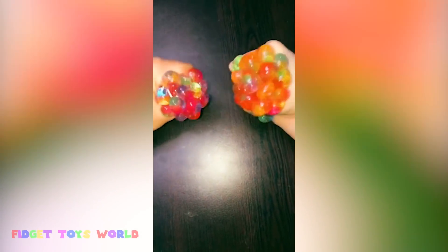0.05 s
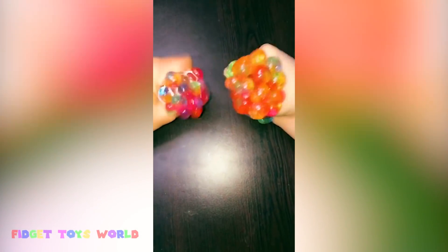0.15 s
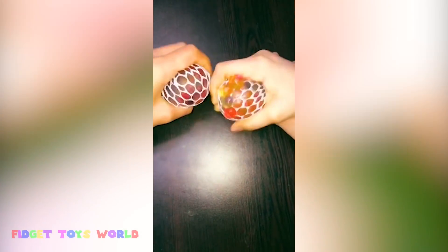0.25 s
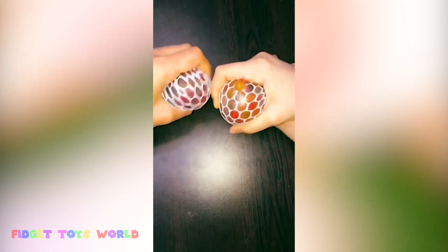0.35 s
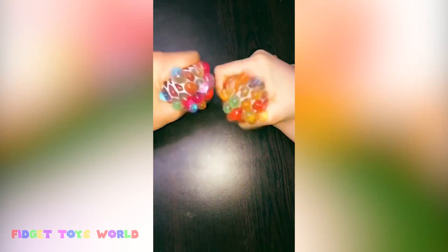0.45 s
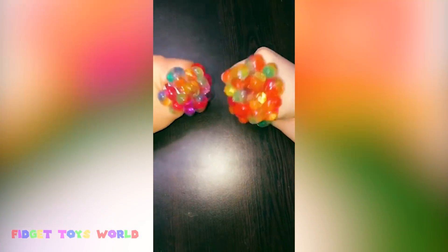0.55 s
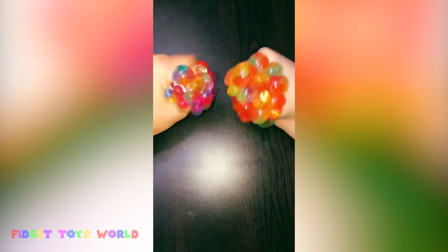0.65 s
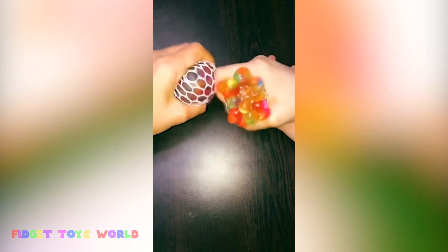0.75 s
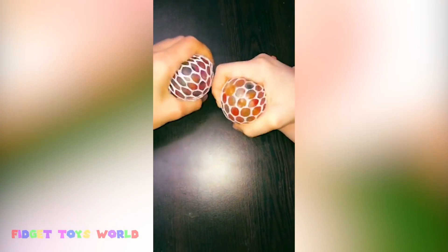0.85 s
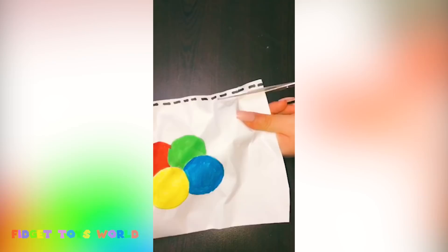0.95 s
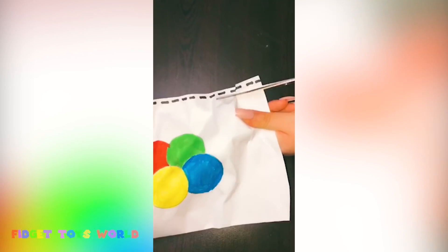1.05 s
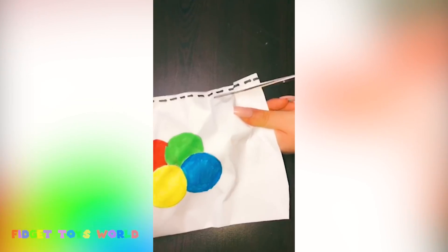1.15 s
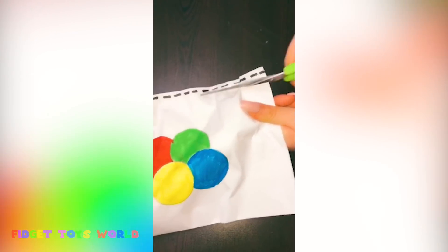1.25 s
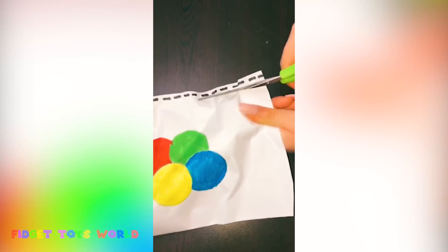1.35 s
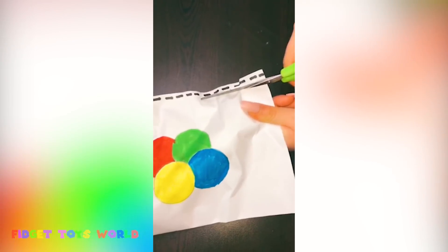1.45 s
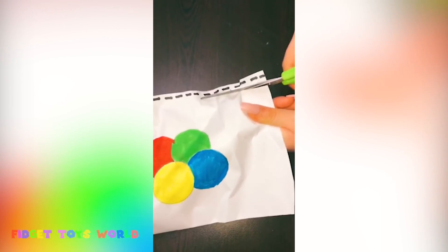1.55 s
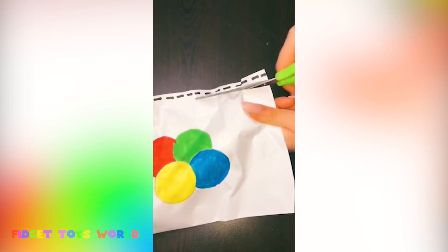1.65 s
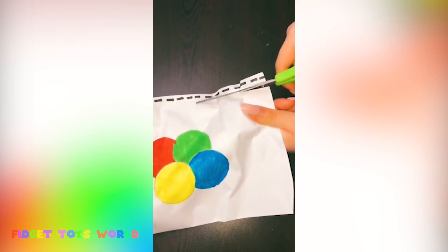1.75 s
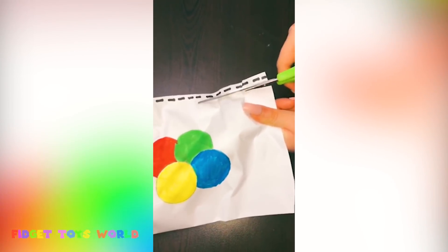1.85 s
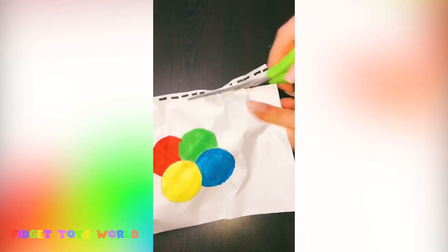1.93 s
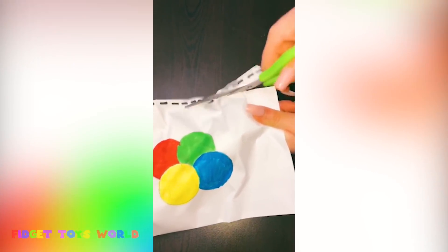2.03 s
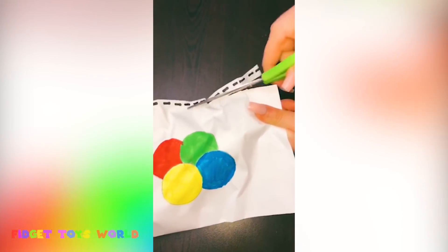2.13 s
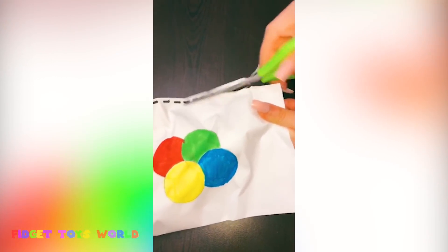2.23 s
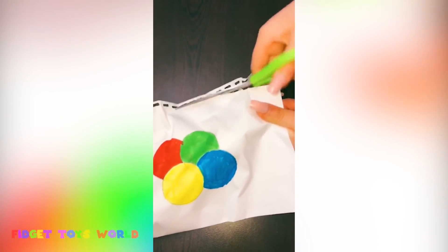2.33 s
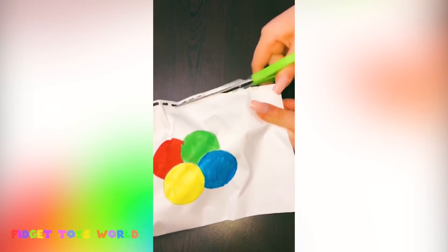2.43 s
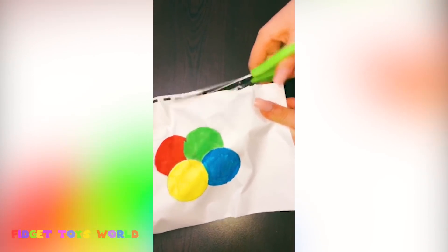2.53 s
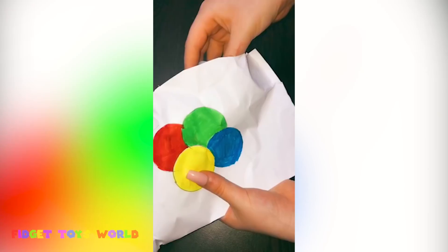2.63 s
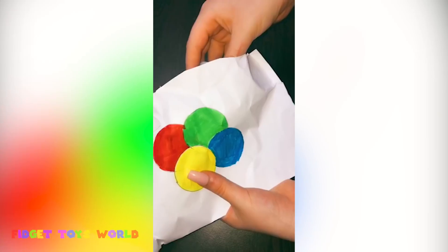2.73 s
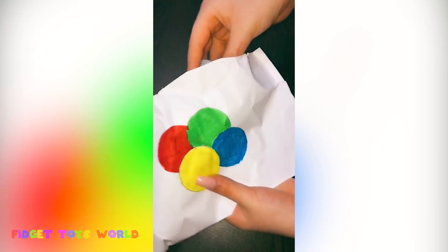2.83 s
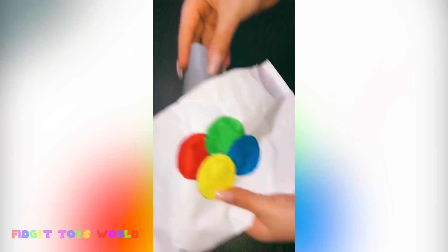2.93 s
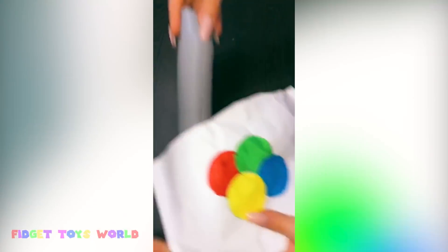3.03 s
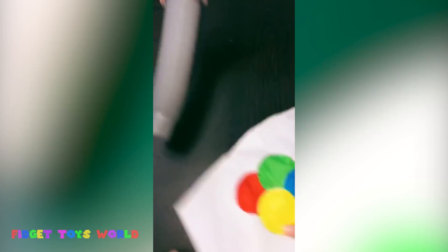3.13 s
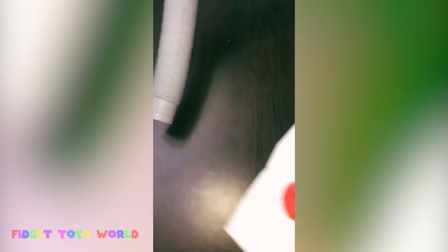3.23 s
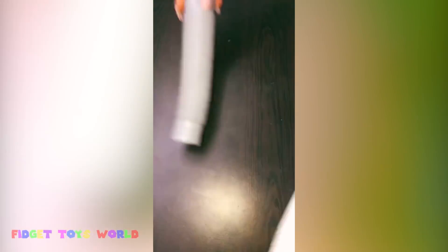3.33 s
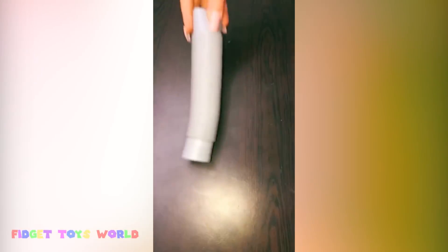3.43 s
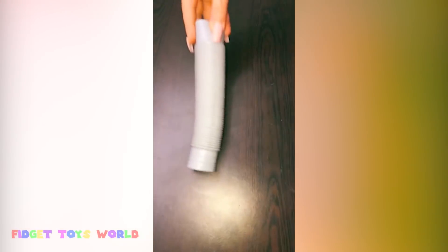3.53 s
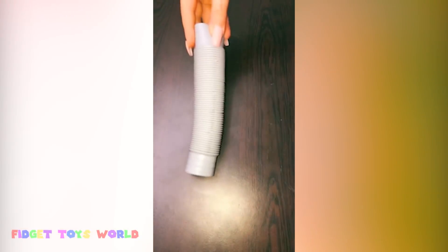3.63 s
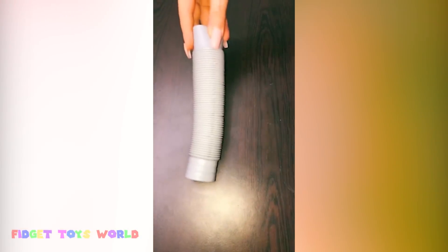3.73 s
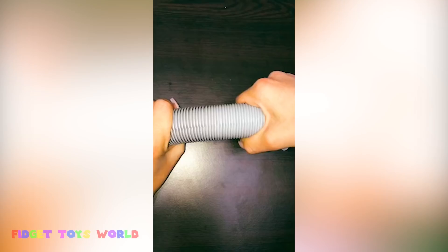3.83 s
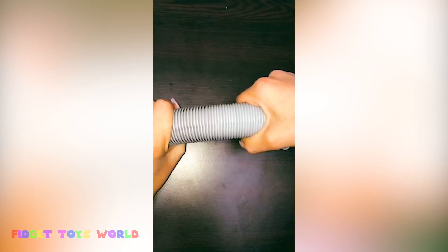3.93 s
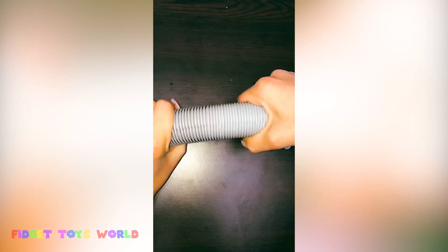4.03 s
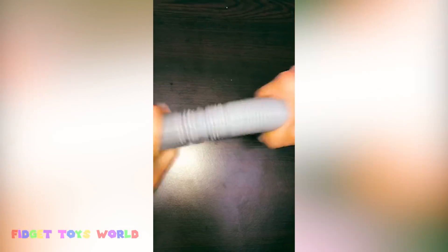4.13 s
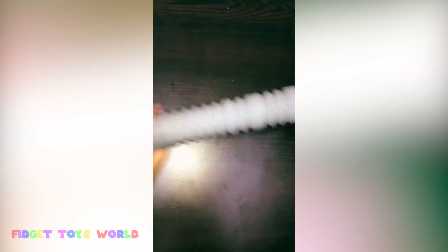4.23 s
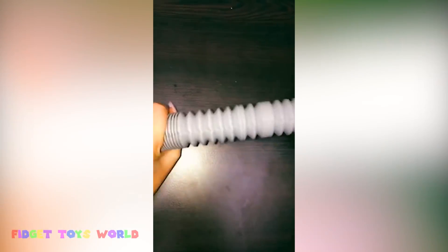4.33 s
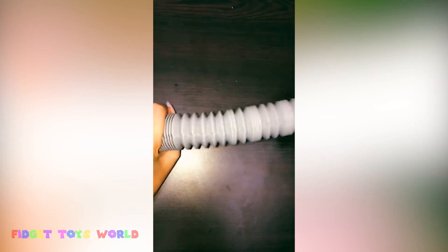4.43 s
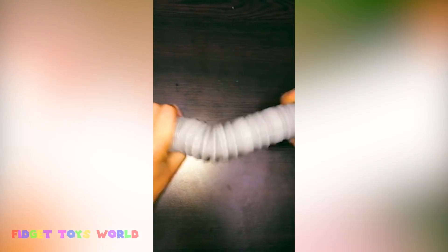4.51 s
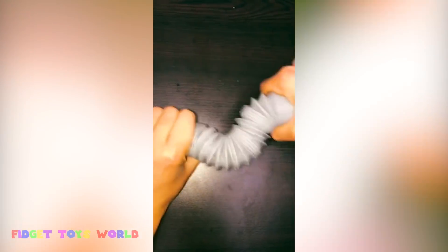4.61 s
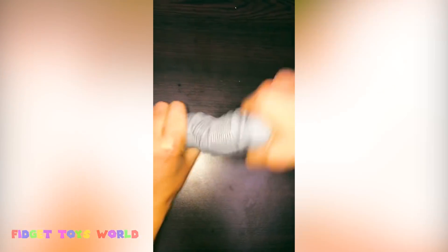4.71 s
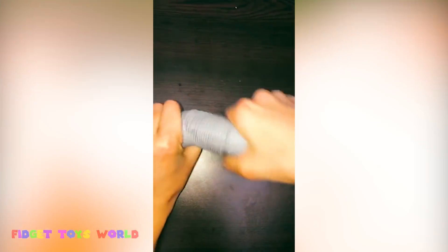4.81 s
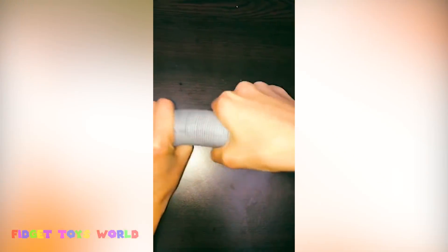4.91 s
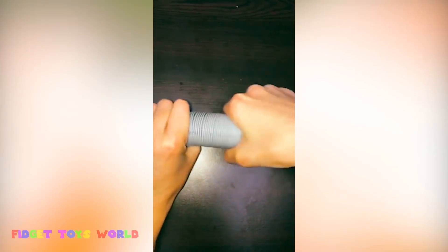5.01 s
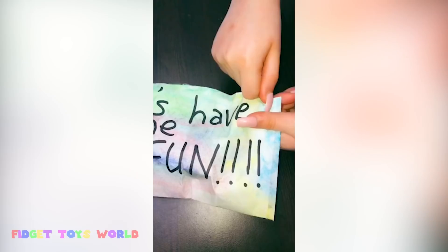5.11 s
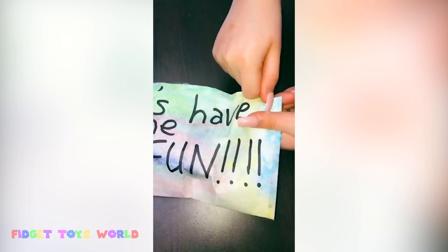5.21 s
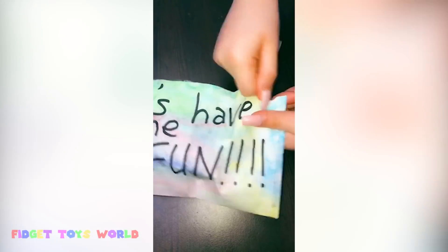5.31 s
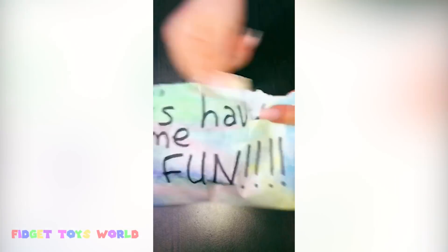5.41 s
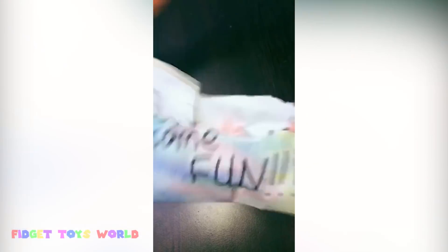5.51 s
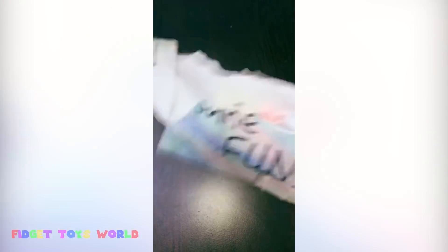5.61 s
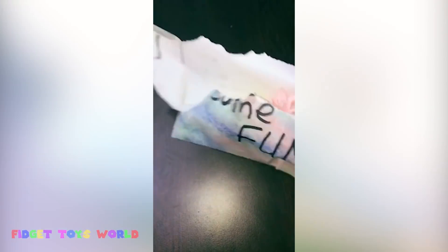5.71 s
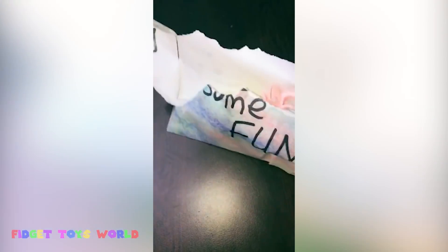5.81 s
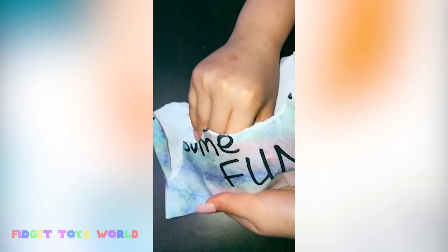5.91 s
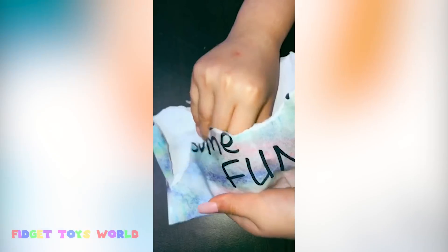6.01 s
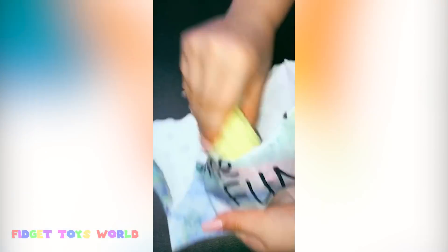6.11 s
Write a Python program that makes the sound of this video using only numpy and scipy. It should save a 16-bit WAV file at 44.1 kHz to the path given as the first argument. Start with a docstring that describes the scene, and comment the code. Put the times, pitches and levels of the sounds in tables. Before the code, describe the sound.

In a small, slightly echoing room, five short handling sounds come close to the microphone, split by abrupt silences. First come soft, wet, crackly squeezes of bead-filled balls, then scissors crunching through paper, then a crinkling swish of the bag. A ribbed plastic tube pops rapidly, falling in pitch as it stretches and rising as it closes. A loud paper rip comes last. Hands bump softly on the table throughout.

```python
"""Five short scenes at a table in a small, echoing room, with brief silences between them. First, hands squeeze
two mesh balls, and the wet gel beads inside click past each other. Next, scissors rasp and catch through a
paper bag. Then the paper swishes as a ribbed plastic tube is pulled out. The tube is stretched and pushed shut:
its ribs flip over and set the air inside ringing in hollow pops. Last, a paper pouch is torn open. All along,
sharp clicks and snaps ring out and hands bump softly on the table."""
import sys
import numpy as np
from scipy import signal
from scipy.fft import rfft, irfft, next_fast_len
from scipy.io import wavfile
from scipy.ndimage import uniform_filter1d

SR = 44100
rng = np.random.default_rng(int(sys.argv[2]) if len(sys.argv) > 2 else 0)


def persist_wave(psi):
    """Save psi, clipped to +-1, as 16-bit WAV."""
    counts = np.round(np.clip(psi, -1, 1) * 32767).astype(np.int16)
    wavfile.write(sys.argv[1], SR, np.atleast_2d(counts).T)


N = 271656

# Tone colours, or how strong each pitch is: f/Hz, level/dB
ROOM_TONE_COLOUR = [(88, -37), (150, -9.5), (182, -17), (457, -26), (888, -23), (4950, -32), (6020, -34),
                    (16000, -42.5)]
RUMBLE_COLOUR = [(12, -36.5), (20, -2), (49, 8.5), (73, 3), (108, -1.5), (140, -7), (162, -12), (200, -6),
                 (260, -23.5), (440, -120)]
BEAD_COLOUR = [(88, -42.5), (150, -26.5), (286, -9), (321, -16), (805, -11), (1390, 10.5), (3420, 8),
               (4410, 8.5), (10400, -6), (14200, -2.5), (16000, -6)]
SCISSOR_COLOUR = [(88, -42), (150, -19.5), (240, -11), (466, -13), (871, -19.5), (1140, -1.5), (1830, -9),
                  (2140, -2.5), (3550, -15), (4490, -10), (4860, -13), (14200, -18), (16000, -24.5)]
BAG_COLOUR = [(88, -40), (150, -10), (745, -12.5), (1260, -6.5), (1760, -12), (2360, -8.5), (3040, -16),
              (4410, -11.5), (6770, -20.5), (14800, -19.5), (16000, -21)]
TUBE_WALL_COLOUR = [(120, -23.5), (350, -11), (900, -8.5), (2400, -1), (3800, -6), (6000, -3), (9000, -4.5),
                    (16000, -9.5)]
POUCH_COLOUR = [(88, -39.5), (150, 2), (334, 4), (383, -1.5), (504, 7.5), (979, -8.5), (2700, -3),
                (3160, -9), (4080, -6), (7620, -16.5), (9440, -16.5), (14000, -18.5), (16000, -18)]
MIC_COLOUR = [(7500, -0.5), (9400, 1), (9900, 1.5), (10300, -2), (12500, 0.5)]  # the microphone's opening rings just under 10 kHz
# The room's steady hush, one value for each stretch of sound: level/dB
ROOM_TONE_LEVELS = [-61, -65, -65, -67.5, -58, -58.5]
# Soft bumps of the hands, felt through the table: t/s, level/dB
HAND_BUMPS = [(.1, -45), (.45, -45), (.66, -47.5), (.85, -48.5), (1.27, -51), (1.4, -41), (1.73, -58),
              (1.89, -40.5), (2.08, -42), (2.22, -42), (2.4, -59), (2.55, -47), (2.73, -48), (2.92, -49),
              (3.02, -45), (3.12, -39.5), (3.28, -39), (3.5, -54), (3.76, -55), (3.86, -56.5), (4.12, -68),
              (4.319, -42.5), (4.68, -34.5), (4.82, -38), (4.97, -45), (5.12, -55), (5.58, -33),
              (5.68, -29), (5.77, -27.5), (5.92, -49)]
# Hand strokes, at full strength at t. Level is the middle band; body and hiss are relative to it:
# t/s, rise/s, hold/s, fall/s, level/dB, body/dB, hiss/dB
SQUEEZE_STROKES = [(.08, 0.042, 0.11, 0.054, -31, -15, 3), (.255, 0.028, .03, 0.025, -44.5, -12, -0.5),
                   (.3, 0.053, 0.066, 0.062, -32, -7, -1.5), (.43, 0.0035, 0.17, 0.026, -56, 10.5, -14),
                   (.57, 0.036, 0.11, 0.11, -31.5, -12.5, 4), (.76, 0.027, 0.027, 0.0314, -45.5, -15, 5.5),
                   (.815, 0.07, 0.099, 0.061, -33.5, -8, -0.5)]
CUT_STROKES = [(1.235, 0.04, 0.021, .02, -53, -3, -10), (1.285, 0.01, 0.11, .05, -35, -9, -7),
               (1.47, 0.086, 0.0041, .03, -44.5, 4, -6), (1.506, 0.0034, 0.02, .06, -47, 4, -6.5),
               (1.7, 0.046, 0.087, .04, -39.5, 4, -11), (1.835, 0.013, 0.029, .02, -44, 8, -9),
               (1.862, 0.013, 0.0067, .11, -29.5, -3, -9), (2.003, .006, 0.069, .1, -36, -4, -6),
               (2.172, .004, .095, .03, -34.5, -3, -6), (2.34, 0.019, 0.027, 0.015, -32, -8, -12.5),
               (2.365, .02, .055, .02, -33, -11, -5), (2.46, .025, 0.085, .1, -30, -3, -8),
               (2.655, 0.012, 0.0033, .05, -25.5, -4, -14), (2.72, 0.016, 0.012, .02, -42.5, -7.5, -3)]
PULL_STROKES = [(3.0, 0.081, 0.177, 0.076, -34.5, -3.5, -3.5), (3.2, 0.032, 0.044, 0.038, -32.5, -7, -3.5),
                (3.275, 0.013, 0.0073, 0.035, -38.5, -3.5, -23), (3.33, 0.022, 0.22, .13, -46, -7.5, 2.5),
                (3.71, 0.035, 0.0076, 0.068, -61.5, 2, -2)]
TEAR_STROKES = [(5.385, 0.0051, 0.0083, 0.019, -55.5, -3.5, 4), (5.45, 0.056, 0.098, .03, -30.5, -10, 0),
                (5.53, 0.065, 0.11, 0.023, -18.5, -7.5, -0.5),
                (5.657, 0.017, 0.034, 0.029, -18.5, -5, -0.5), (5.71, 0.02, 0.046, 0.043, -17, -7, -4.5),
                (5.8, 0.013, 0.019, 0.25, -40, -3, -14), (6.135, .005, .03, 0.13, -45, -1, -9)]
# Clicks of the beads in the first scene, creases that snap and blades that catch later on, and at 0.43 s a ball
# knocking the table: t/s, level/dB, ring f/Hz, # thud/dB, thud f/Hz, hiss/dB
CLICKS_AND_SNAPS = [(.021, -40, 1400, -13, 300, -24), (.1914, -41, 4300, -26, 300, 1),
                    (.3172, -30, 4460, -18, 300, -15), (.4279, -48, 1350, 20, 355, -18),
                    (.5586, -17.5, 4470, -22, 294, -22), (.7577, -32.5, 1320, -33, 300, -4),
                    (.815, -17, 4500, -38, 300, -21), (0.971, -46.5, 4270, -27, 300, 6),
                    (1.382, -24.5, 1300, -12, 352, -24), (1.418, -39, 1100, 4, 300, -20),
                    (1.475, -37, 4020, -11, 350, -5), (1.506, -27.5, 1240, -16, 430, -6),
                    (1.523, -33.5, 4530, -22, 350, -9), (1.534, -46, 2500, -17, 350, -1.5),
                    (1.722, -35, 1130, 12.5, 363, -26), (1.74, -40, 1130, 10, 340, -26),
                    (1.8592, -13, 1950, -8, 357, 2), (2.0028, -19.5, 1300, -5, 433, -14),
                    (2.0657, -22, 1950, -20, 346, -5.5), (2.145, -37.5, 4500, -10, 357.5, -5.5),
                    (2.171, -23, 1060, -7, 318, 0), (2.1959, -23, 1070, -12, 636, -6),
                    (2.3545, -19.5, 1230, -5.5, 250, -21.5), (2.3724, -19, 1270, -4, 303, -27),
                    (2.3785, -12, 1230, -5, 243, -25.5), (2.3828, -9, 1197, -8.5, 250, -20.5),
                    (2.394, -4, 1180, -8, 252, -25), (2.4154, -5.5, 1400, -12, 267, -28.5),
                    (2.5117, -18.5, 1280, -15.5, 460, -23), (2.6545, -17.5, 1090, -7.5, 300, -21),
                    (2.9307, -31, 960, -2, 200, -23.5), (2.9956, -13, 2100, -9.5, 460, -7.5),
                    (3.0174, -21, 1170, -30, 395, -8.5), (3.0265, -3.5, 2400, -16, 345, -1),
                    (3.0649, -17, 2270, -9, 316, -6.5), (3.0869, -16, 1420, -11.5, 786, -20.5),
                    (3.1188, -13.5, 2340, -20, 640, -9.5), (3.127, -15.5, 1290, -7, 816, -29),
                    (3.1418, -15.5, 1290, -5.5, 630, -20), (3.1574, -16.5, 1260, -25, 300, -14.5),
                    (3.2304, -25, 4360, -9, 643, 9), (3.3159, -15, 1440, -19, 290, -9),
                    (4.2178, -49, 2560, -5, 334, -16), (5.5677, -10.5, 2300, -23, 490, -6.5),
                    (5.6114, -13.5, 2840, -25, 665, -8.5), (5.6366, -11.5, 2770, -5, 200, -15),
                    (5.654, -6.5, 2620, -15, 277, -19), (5.7064, -2.5, 2770, -18, 415, -5),
                    (5.7639, -8.5, 1720, -6, 489, -23.5), (5.9983, -11.5, 1504, -21, 767, -40),
                    (6.1344, -24, 1590, -11, 540, -31)]
# Ribs of the tube flipping over: t/s, level/dB, rib f/Hz, lowest air tone/dB, crack/dB
RIB_POPS = [(4.2632, -0.5, 1330, -4, -29), (4.2782, -1.5, 1490, -15.5, -33.5), (4.2834, -4.5, 2580, 4, -28),
            (4.2884, -10.5, 1466, 10, -26.5), (4.2969, -1.5, 2170, -17, -32), (4.3024, -1, 1260, -4, -32),
            (4.3074, -0.5, 2320, -21, -31), (4.3144, -5, 2150, -5, -26), (4.3204, -6, 2420, -9, -29),
            (4.3246, -0.5, 1240, -5.5, -37), (4.3322, -8, 2510, -7, -21), (4.3363, 0, 1450, -31, -27),
            (4.346, -0.5, 2400, -13.5, -31.5), (4.6099, -6, 1570, -6.5, -9.5),
            (4.6374, -6.5, 2460, 2.5, -12), (4.6551, -8, 1540, -4, -7.5), (4.6674, -11, 2430, 5.5, -12),
            (4.6778, -13, 2350, 1, -6), (4.692, -7.5, 1560, 0, -10.5), (4.7204, -29, 1270, 20.5, -24),
            (4.7416, -10.5, 1200, -9, -18.5), (4.7795, -10.5, 1480, -10, -6.5),
            (4.8005, -7.5, 2120, 4.5, -18), (4.8179, -4.5, 2090, -8.5, -14.5),
            (4.8224, -7, 2080, -1.5, -17.5), (4.8349, -2.5, 1586, -30, -13),
            (4.8404, -1.5, 1455, -19.5, -9.5), (4.8464, -9, 1485, -14, -6), (4.8584, -3.5, 2050, -2, -7.5),
            (4.8654, -13.5, 1500, -3.5, -4.5), (4.875, -18.5, 1500, 1.5, -15), (4.9217, -21, 1370, 7, -12),
            (4.9442, -12, 2280, 5, -12), (4.9524, -14.5, 1650, 1, -10), (4.9701, -20, 1636, 4.5, -38)]
# The pitch of the air in the tube sinks as it is stretched and climbs as it is shut: t/s, f/Hz
TUBE_PITCH = [(4.26, 707), (4.31, 569), (4.36, 478), (4.45, 520), (4.6, 547), (4.8, 658), (4.86, 791.5),
              (4.92, 775), (5.0, 857)]
# How long the echo takes to fade by 60 dB: f/Hz, fade/s
ECHO_FADES = [(200, 0.26), (600, 0.46), (1400, 0.51), (4000, 0.51), (8000, 0.27), (14000, 0.47)]
# Standing waves, the pitches the room favours: f/Hz, width/Hz, level/dB
STANDING_WAVES = [(350, 85, 9.5), (606, 87, 2.5), (880, 100, 3.5)]
# The silences: start t/s, end t/s
SILENCES = [(1.074, 1.214), (2.75, 2.885), (3.906, 4.027), (5.21, 5.324), (6.004, 6.129)]


def amp(db):
    """Turn decibels into a factor to multiply by."""
    return 10 ** (np.asarray(db) / 20)


def unit(x):
    """Scale a sound to an average strength (rms) of 1."""
    return x / np.sqrt(np.mean(x ** 2) + 1e-20)


def along(points, hz):
    """Read between the rows of a table, on a log frequency scale."""
    freqs, values = np.transpose(points)
    return np.interp(np.log(hz + 1), np.log(freqs + 1), values)


def curve(points):
    """Join (time, value) points into one value per sample."""
    return np.interp(np.arange(N) / SR, *np.transpose(points))


def filtered(x, response):
    """Scale each frequency of x by response(hz)."""
    size = next_fast_len(x.shape[-1] + 8192)
    return irfft(rfft(x, size) * response(np.fft.rfftfreq(size, 1 / SR)), size)[..., :x.shape[-1]]


def resonance(f, hz, width_hz):
    """A filter peak of height 1 that rings at hz."""
    return 1j * f * width_hz / (hz ** 2 - f * f + 1j * f * width_hz)


def three_bands(x, colour):
    """Colour a sound and split it into low body, middle and high hiss, all equally strong."""
    low = lambda hz: 1 / (1 + (hz / 950) ** 6)
    high = lambda hz: 1 - 1 / (1 + (hz / 6500) ** 8)
    bands = filtered(x, lambda hz: colour(hz) * np.array([low(hz), 1 - low(hz) - high(hz), high(hz)]))
    return [unit(band) for band in bands]


def patchy(x, depth_db):
    """Make random patches of time and pitch louder or softer."""
    spectrum = signal.stft(x, nperseg=256)[2]

    def patches(bins, frames):
        across_pitch = uniform_filter1d(rng.standard_normal(spectrum.shape), bins, axis=0)
        return unit(uniform_filter1d(across_pitch, frames, axis=1))

    gain = amp(depth_db * (patches(bins=5, frames=4) + 0.9 * patches(bins=3, frames=30)))
    return signal.istft(spectrum * gain, nperseg=256)[1][:len(x)]


def stroke_loudness(strokes, sag_db_per_s):
    """Each stroke rises, sags while held, then falls. One sag each for body, middle and hiss."""
    t, power = np.arange(N) / SR, np.zeros((3, N))
    swing_db = 25  # gained in one rise time, lost in one fall time
    for at, rise, hold, fall, db, body_db, hiss_db in strokes:
        away = np.clip(at - t, 0, None) / rise + np.clip(t - at - hold, 0, None) / fall
        held = np.clip(t - at, 0, hold)
        near = away < 4
        full_db = db + np.c_[[body_db, 0, hiss_db]]
        level_db = full_db - swing_db * away[near] - np.c_[sag_db_per_s] * held[near]
        power[:, near] += amp(2 * level_db)
    return np.sqrt(power)


def crackle(strokes, colour, sag_db_per_s, slips_per_s, spread_db, grain_s, steady, patch_db):
    """Countless tiny slips: noise jumps at each one, then dies back to a steady rub."""
    slips = rng.random(N) < slips_per_s / SR
    sizes = slips * amp(spread_db * np.clip(rng.standard_normal(N), -2, 2))
    jumps = signal.lfilter([1], [1, -np.exp(-1 / (grain_s * SR))], sizes)
    rubbing = rng.standard_normal(N) * (unit(jumps) + steady)
    rubbing = patchy(rubbing, patch_db)  # the rub grows louder and softer in patches of time and pitch
    bands = three_bands(rubbing, lambda hz: amp(along(colour, hz)))
    return np.sum(stroke_loudness(strokes, sag_db_per_s) * bands, axis=0)


def burst(t, rise_s, fade_s, colour):
    """A puff of noise in three bands, each peaking at 1, with 40 samples of lead-in."""
    puff = rng.standard_normal(len(t)) * (1 - np.exp(-(t / rise_s) ** 2)) * amp(-60 * t / fade_s)
    return [band / np.max(np.abs(band)) for band in three_bands(np.pad(puff, (40, 0)), colour)]


def room_tone():
    """A faint hush whose level is set anew after each silence."""
    hush = unit(filtered(rng.standard_normal(N), lambda hz: amp(along(ROOM_TONE_COLOUR, hz))))
    stretch = np.searchsorted([end for start, end in SILENCES], np.arange(N) / SR)
    return amp(ROOM_TONE_LEVELS)[stretch] * hush


def hand_bumps():
    """A low rumble swells each time the hands bump the table."""
    t = np.arange(N) / SR
    half_width_s, resting_db = 0.04, -58.5
    rumble = unit(filtered(rng.standard_normal(N), lambda hz: amp(along(RUMBLE_COLOUR, hz))))
    bumps = sum(amp(db) * np.exp(-((t - at) / half_width_s) ** 2) for at, db in HAND_BUMPS)
    return (amp(resting_db) + bumps) * rumble


def squeeze_balls():
    """Wet beads squeeze past each other in fine clicks."""
    return crackle(SQUEEZE_STROKES, BEAD_COLOUR, sag_db_per_s=[110, 90, 70],
                   slips_per_s=1200, spread_db=6, grain_s=0.0005, steady=1.1, patch_db=1.5)


def clicks_and_snaps():
    """A bead clicks or a crease snaps: it rings briefly at its own pitch and thuds as a whole."""
    out, t = np.zeros(N + SR), np.arange(SR // 10) / SR
    for at, db, fold_hz, thud_db, thud_hz, hiss_db in CLICKS_AND_SNAPS:
        length = amp(-0.12 * (db + 20))  # louder snaps are shorter
        fold = lambda f: amp(13) * resonance(f, fold_hz, width_hz=320 / length)
        sheet = lambda f: 1 + fold(f) - amp(16.5) * resonance(f, thud_hz, width_hz=64)
        thud, middle, hiss = burst(t, rise_s=length * 0.0008, fade_s=length * 0.018, colour=sheet)
        snap = middle + amp(thud_db) * thud + amp(hiss_db) * hiss
        out[round(at * SR) - 40:][:len(snap)] += amp(db) * snap
    return out[:N]


def cut_bag():
    """Scissor blades rasp through the paper bag."""
    return crackle(CUT_STROKES, SCISSOR_COLOUR, sag_db_per_s=[40, 30, 50],
                   slips_per_s=900, spread_db=3, grain_s=0.0025, steady=0.7, patch_db=1.5)


def pull_from_bag():
    """Paper swishes as the tube slides out."""
    return crackle(PULL_STROKES, BAG_COLOUR, sag_db_per_s=[15, 8, 8],
                   slips_per_s=610, spread_db=-2.5, grain_s=0.0042, steady=0.53, patch_db=1.4)


def tube_pops():
    """Each rib cracks, rings and kicks the air in the tube, whose pitch follows the tube's length."""
    out, t = np.zeros(N + SR), np.arange(SR // 8) / SR
    push_starts_s = 4.5
    pitch = curve(TUBE_PITCH)
    running_phase = np.pad(2 * np.pi * np.cumsum(pitch) / SR, (0, SR), "edge")
    swell = 1 - np.exp(-t / 0.0012)  # the pressure wave needs a trip along the tube
    for at, db, rib_hz, lowest_db, crack_db in RIB_POPS:
        start = round(at * SR)
        rib = lambda f: 1 + amp(16) * resonance(f, rib_hz, width_hz=400)
        wall = lambda f: amp(along(TUBE_WALL_COLOUR, f)) * rib(f)
        knock, middle, hiss = burst(t, rise_s=0.00044, fade_s=0.023, colour=wall)
        blur = 0.013 * np.cumsum(rng.standard_normal(len(t)))  # the flexing wall blurs the pitch
        phase = running_phase[start:start + len(t)] - running_phase[start] + blur
        octaves_up = np.log2(pitch[start] / pitch[round(push_starts_s * SR)])
        overtone_db = (-5 if at < push_starts_s else -4.5) - 15 * octaves_up
        overtones = np.sin(1.97 * phase) + amp(-8) * np.sin(2.95 * phase)
        air = amp(lowest_db - 60 * t / 0.062) * np.sin(phase)
        air += amp(overtone_db - 60 * t / 0.055) * overtones
        pop = middle + amp(crack_db) * hiss + amp(-12) * knock + np.pad(swell * air, (40, 0))
        out[start - 40:][:len(pop)] += amp(db) * pop
    return out[:N]


def tear_pouch():
    """The paper pouch rips open with a loud rasp."""
    return crackle(TEAR_STROKES, POUCH_COLOUR, sag_db_per_s=[8, 3, 12],
                   slips_per_s=530, spread_db=10.5, grain_s=0.0017, steady=2.74, patch_db=2.46)


def room_echo(x):
    """Each pitch of the echo dies at its own speed; a few standing waves stick out."""
    hz, t, noise = signal.stft(rng.standard_normal(SR // 2), SR, nperseg=256)
    tail = signal.istft(noise * amp(-60 * t / along(ECHO_FADES, hz)[:, None]), SR, nperseg=256)[1]
    peaks = lambda f: sum(amp(db) * resonance(f, centre, width) for centre, width, db in STANDING_WAVES)
    tail = filtered(tail, lambda f: 1 + peaks(f))
    echo = signal.fftconvolve(np.pad(x, (300, 0)), tail / np.linalg.norm(tail))[:N]
    return patchy(echo, depth_db=1.5)  # moving hands stir the echoes


def scene():
    """Add up everything on the table and its echo, in one channel."""
    crackles = squeeze_balls() + cut_bag() + pull_from_bag() + tear_pouch()
    snaps, pops = clicks_and_snaps(), tube_pops()
    echo = room_echo(amp(-18.5) * crackles + amp(-13.5) * snaps + amp(-16) * pops)
    return (crackles + snaps + pops + echo + room_tone() + hand_bumps())[None]


def record(dry):
    """Round off the peaks and mute the silences; the microphone colours the treble, which ends steeply."""
    rounded = dry / (1 + np.abs(dry) ** 6) ** (1 / 6)
    on_off = curve([point for start, end in SILENCES
                    for point in [(start, 1), (start + 0.0025, 0), (end - 0.004, 0), (end, 1)]])
    below = lambda hz, edge_hz: np.clip((edge_hz - hz) / 300, 0, 1) ** 2
    microphone = lambda hz: amp(along(MIC_COLOUR, hz)) * below(hz, 15950) + amp(-43.5) * below(hz, 16850)
    return filtered(rounded * on_off, microphone)


dry = scene()
out = record(dry)
persist_wave(out)
```